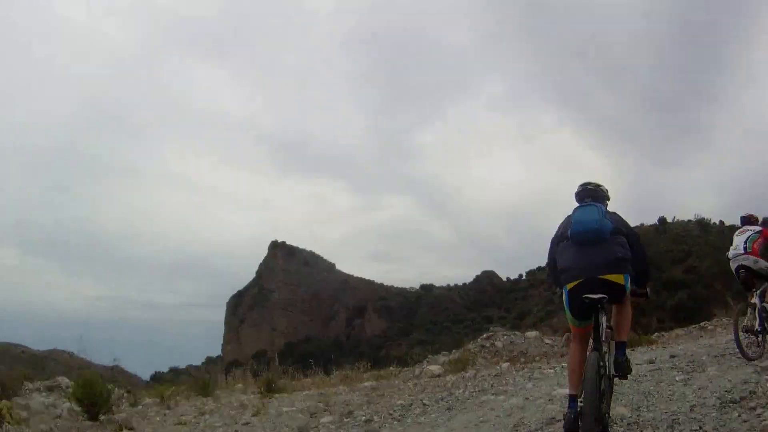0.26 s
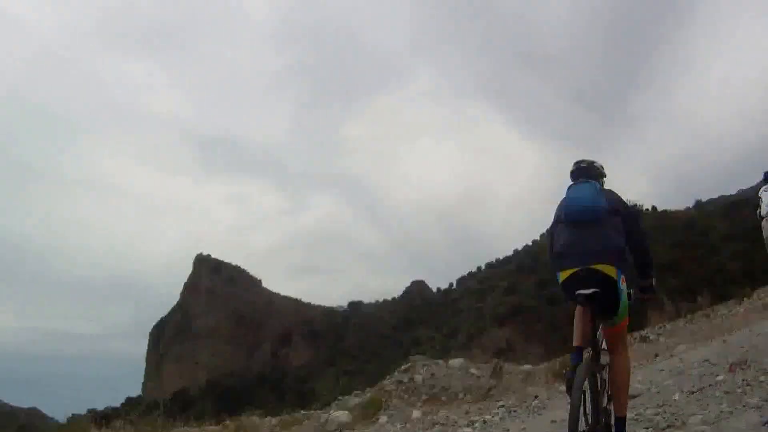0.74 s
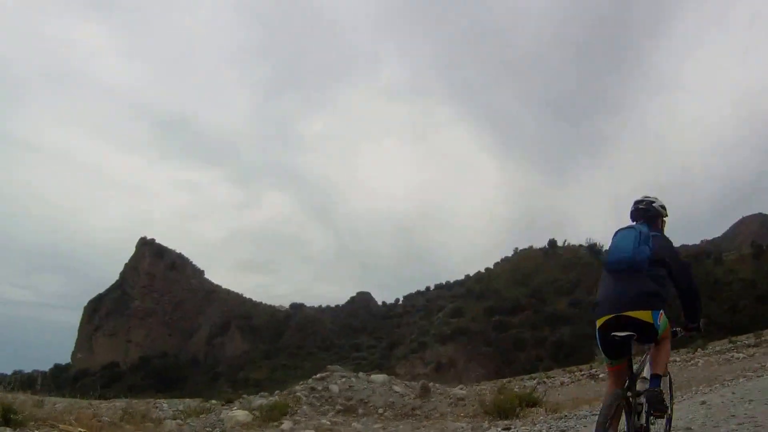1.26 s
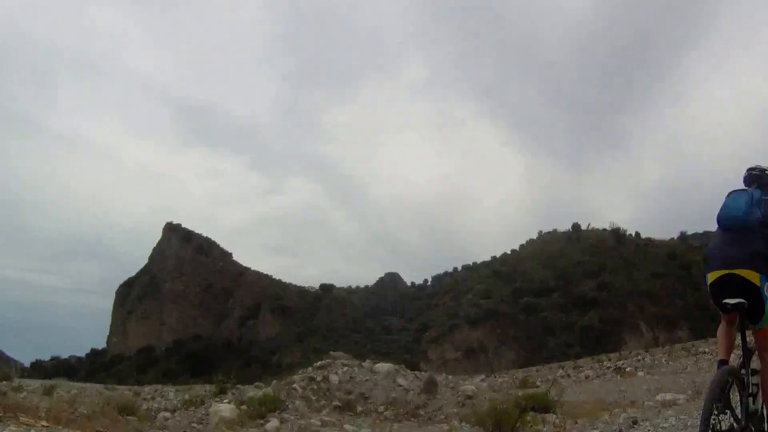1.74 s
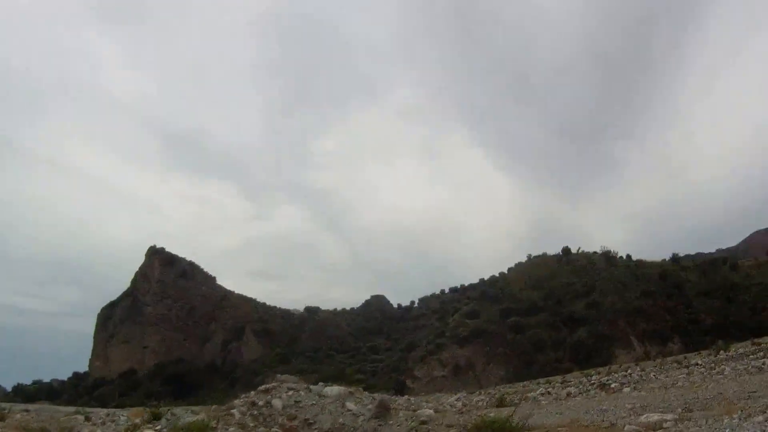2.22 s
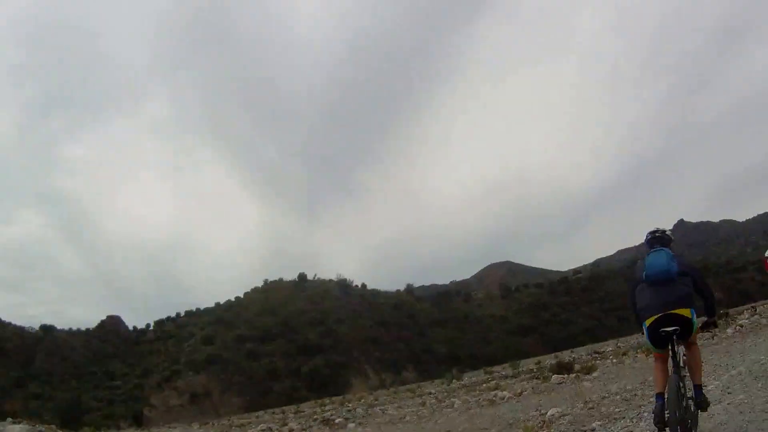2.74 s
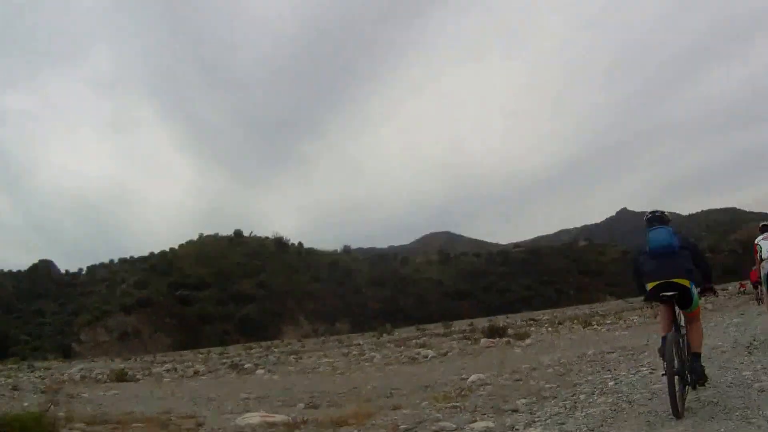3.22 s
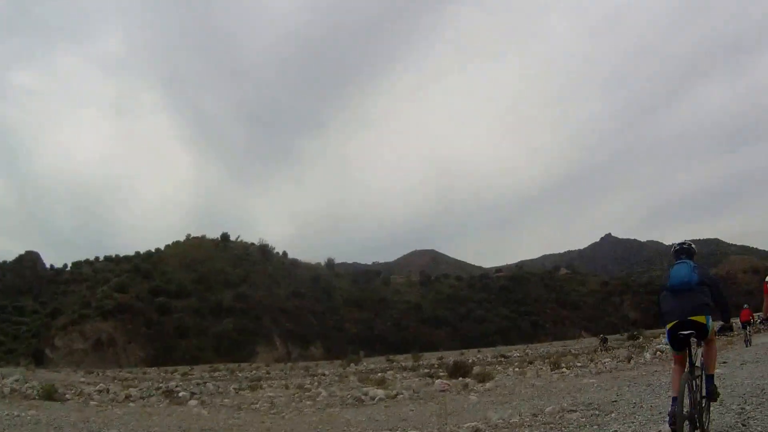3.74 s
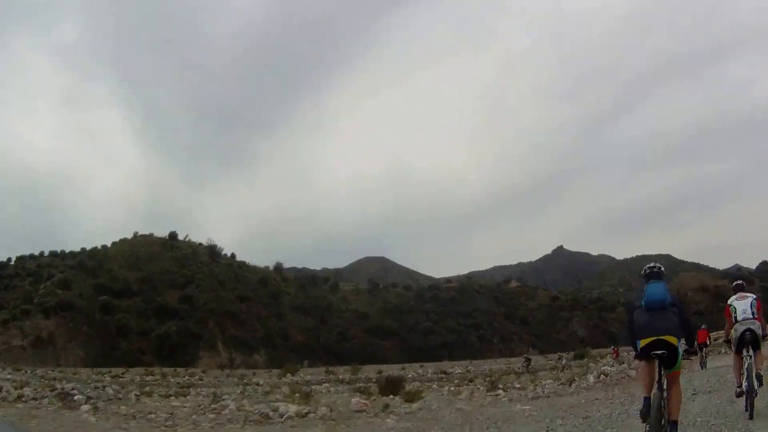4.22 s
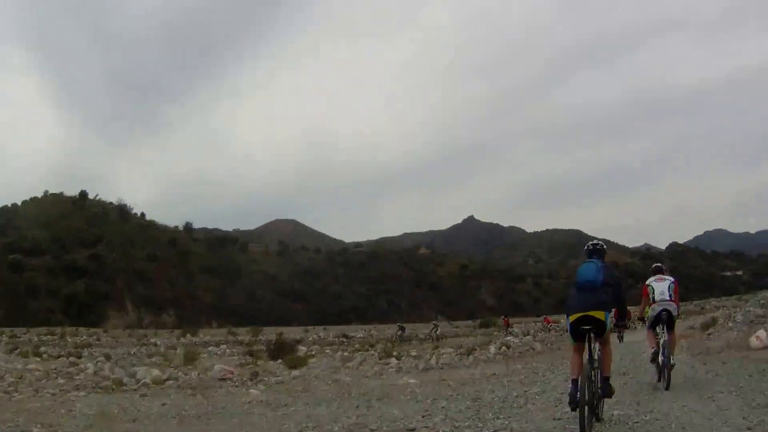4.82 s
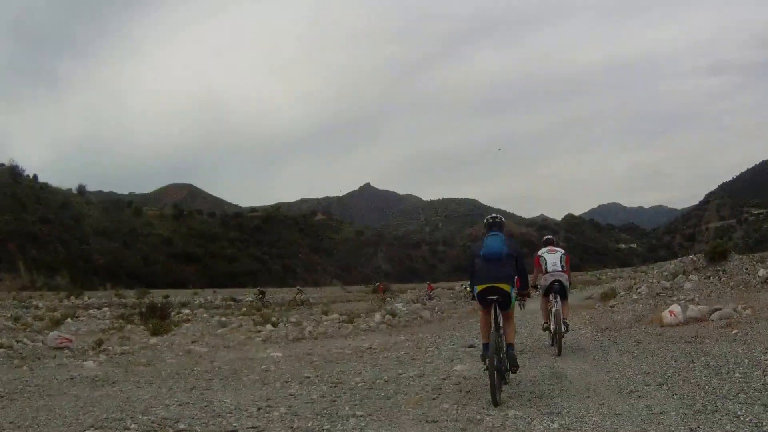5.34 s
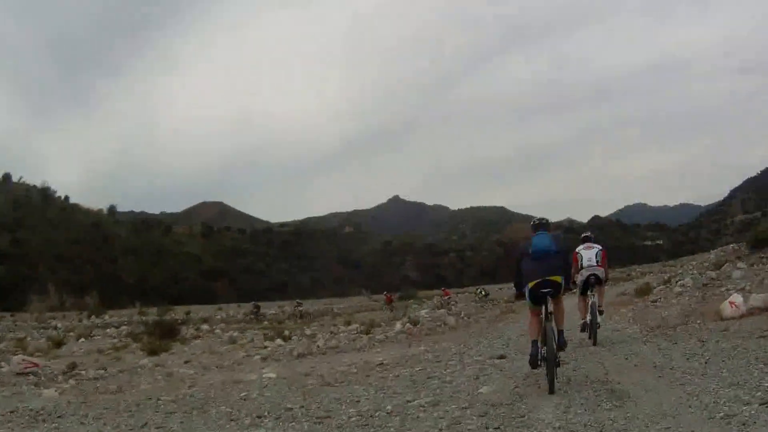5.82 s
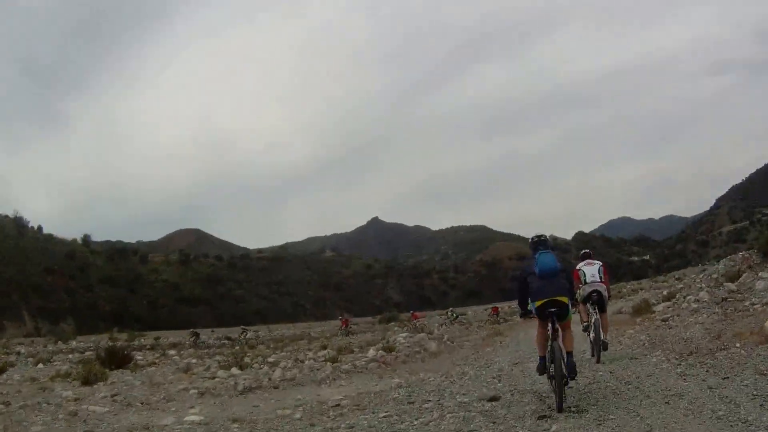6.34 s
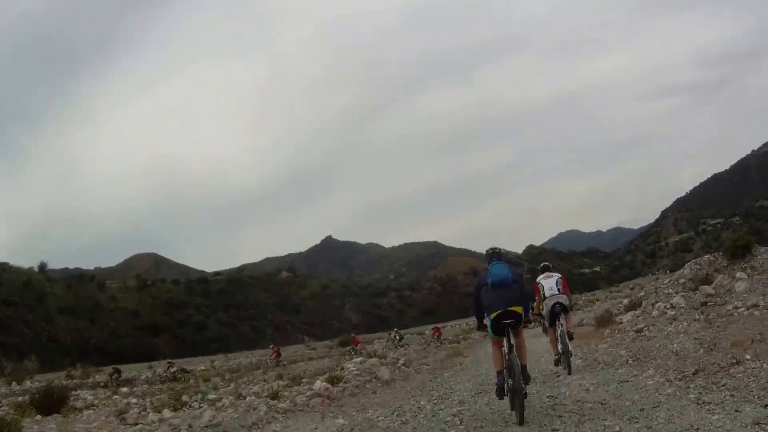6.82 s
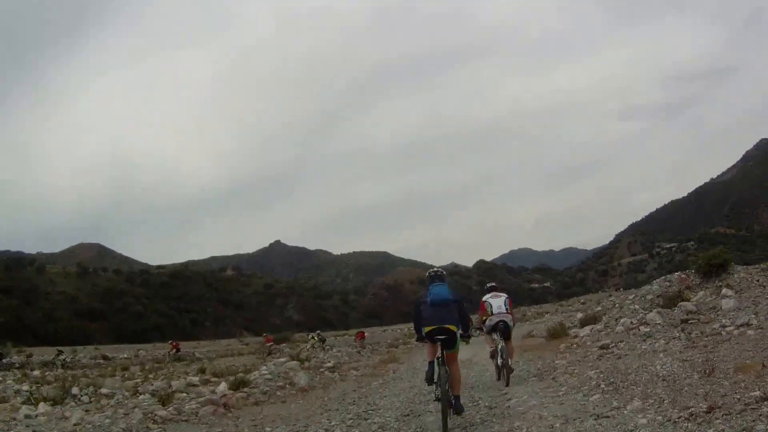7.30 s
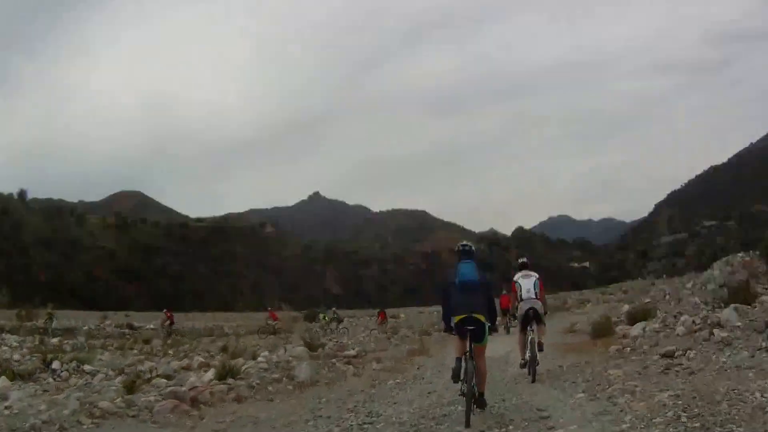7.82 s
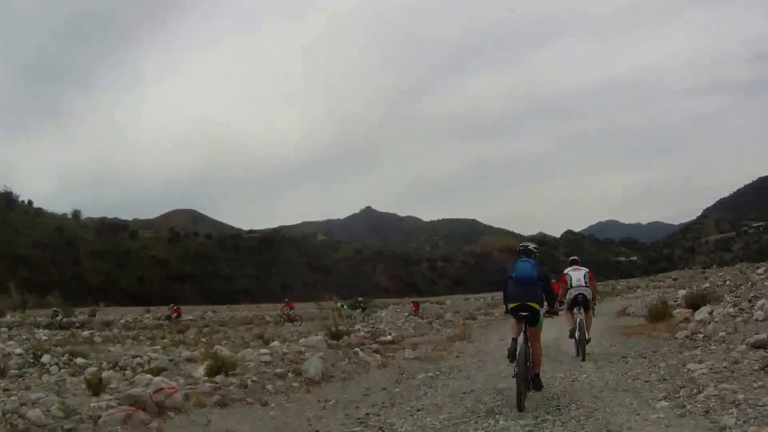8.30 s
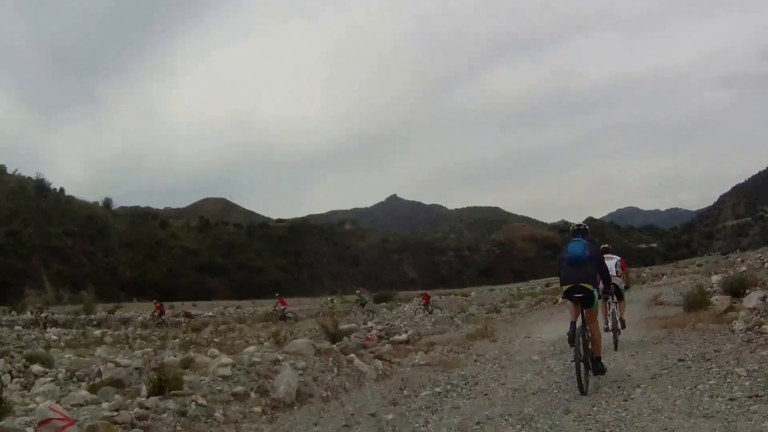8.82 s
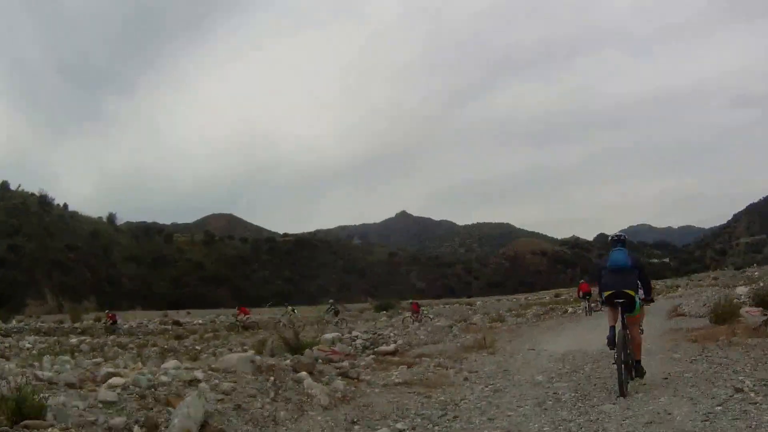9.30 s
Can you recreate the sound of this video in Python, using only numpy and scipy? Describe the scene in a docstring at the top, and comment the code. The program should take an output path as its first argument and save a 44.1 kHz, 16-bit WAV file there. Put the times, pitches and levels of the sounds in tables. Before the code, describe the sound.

Hard plastic knocks and rattles of a housed camera on a mountain bike jolting down stony gravel, over tyre roll, hiss and low rumble.

```python
"""A camera in a closed plastic housing rides on a bicycle down a stony track.
Tyre roll, loose chatter, gravel hiss (all shaped noise) and a low rumble run from the start to the end.
From about 0.3 s stones jolt the frame: clusters of bounces ring the housing, with short scrapes between.
The knocks thin out from about 3.6 s, then crowd together again from about 4.9 s.
The single microphone overloads on the hardest knocks."""
import sys
import numpy as np
from scipy import signal
from scipy.fft import rfft, irfft
from scipy.io import wavfile
from scipy.ndimage import uniform_filter1d

SR = 44100
rng = np.random.default_rng(int(sys.argv[2]) if len(sys.argv) > 2 else 0)


def level_to_linear(level):
    """Convert decibel levels to linear amplitude factors, elementwise."""
    exponent = np.asarray(level, float) / 20
    return 10 ** exponent


def put_to_file(sound):
    """Save the sound as 16-bit audio at rate SR, in the file named by the first command-line argument."""
    columns = np.atleast_2d(sound).T  # one column per channel
    safe = np.clip(columns, -1, 1)
    whole_steps = np.round(safe * 32767)
    wavfile.write(sys.argv[1], SR, whole_steps.astype(np.int16))


N = 421594  # length in samples


def evened(x):
    """Scales a sound to rms 1."""
    return x / np.sqrt(np.mean(x ** 2) + 1e-20)


def flutter(hz):
    """A wandering curve: straight lines between random points of rms 1, hz points a second."""
    points = rng.standard_normal(N // 16)
    return np.interp(np.arange(N) / SR * hz, np.arange(len(points)), points)


def ride():
    """How strongly the ride shakes the tyre roll, walls and window, one value in dB a sample."""
    # Each row: time in seconds, tyre roll in dB, chatter in the walls in dB,
    # chatter in the window in dB (all before the gusts).
    ride_levels = [(0.0, -39.5, -43, -46), (0.29, -34.5, -41, -40.5), (0.48, -31, -35, -35.5),
                   (0.9, -31, -29, -30.5), (1.36, -34, -41.5, -40.5), (2.16, -43, -28.5, -34.5),
                   (2.74, -33, -40, -37), (3.51, -30.5, -37.5, -36), (3.67, -40.5, -41.5, -43),
                   (3.99, -31.5, -36, -33.5), (4.13, -41, -50, -44), (4.63, -40.5, -50, -45.5),
                   (4.93, -31, -26, -31), (5.27, -34, -28.5, -32.5), (5.78, -33, -40.5, -42.5),
                   (6.1, -30, -40, -37.5), (6.31, -30, -27.5, -31), (6.58, -35.5, -39.5, -40),
                   (7.3, -30.5, -30, -35.5), (7.56, -30.5, -37, -37.5), (7.99, -30, -30.5, -34.5),
                   (8.33, -33.5, -38, -40.5), (9.19, -29, -27.5, -31.5), (9.56, -42.5, -50, -48)]
    s, *columns = np.transpose(ride_levels)
    return [np.interp(np.arange(N) / SR, s, column) for column in columns]


def rings(count, spread_db, squeak_db=0, tilt_db=0):
    """How mount, walls, window and edge ring after a click; each place of contact favours other modes."""
    # What the housing rings with. Each row: middle pitch in Hz, relative level in dB before chance and tilt,
    # time to fall by 60 dB in seconds.
    housing_modes = [(281, -6.5, 0.014), (390, 6, 0.018), (539, -0.5, 0.024), (751.8, 3.5, 0.04),
                     (1223, 11, 0.0074), (1357, -0.5, 0.036), (1608, 8, .016), (2350, 3.5, 0.0057),
                     (2758, -2, 0.0077), (3150, -2, 0.0086), (3555, -2.5, 0.01), (4114, -4, 0.007),
                     (4854, -6.5, 0.0073), (4920, -10.5, 0.0027), (5950, 0.5, 0.0015), (8400, -1.5, 0.0016),
                     (9800, -1, 0.001), (15720, -5.5, 0.0023)]
    # Borders between mount, walls, window and edge, in Hz.
    part_borders = [950, 2400, 5500]
    t = np.arange(1536) / SR
    out = np.zeros((4, count, len(t)))
    chance = rng.standard_normal((count, len(housing_modes), 2, 1))
    for k, (hz, db, t60) in enumerate(housing_modes):
        db = db + spread_db * chance[:, k, 0] + tilt_db * np.log2(hz / 1000)
        if k == len(housing_modes) - 1:
            db = db + squeak_db  # only the highest mode squeaks
        turns = hz * (1 + 0.011 * spread_db * chance[:, k, 1]) * t
        mode = level_to_linear(db - 60 * t / t60) * np.sin(2 * np.pi * turns)
        out[np.searchsorted(part_borders, hz)] += (-1) ** k * mode
    bands_hz = [(150, 1640), (700, 2370), (2200, 5700), (4500, 20400)]
    for part, band_hz in enumerate(bands_hz):
        band = signal.butter(2, band_hz, "band", fs=SR, output="sos")
        out[part] = signal.sosfilt(band, out[part])
    return out / np.linalg.norm(out, axis=2, keepdims=True)


def grit(per_s, spread_db, ms, smooth):
    """Noise of short scrapes, a few of them large, over a smooth shaking."""
    hits = rng.random(N) < per_s / SR
    size = level_to_linear(spread_db * np.minimum(rng.exponential(1, N), 3.2)) * hits
    bump = np.exp(-(np.arange(-200, 200) / (ms * SR / 1000)) ** 2)
    strength = evened(signal.oaconvolve(size, bump, "same")) + smooth
    sparse_noise = rng.standard_normal(N) * (rng.random(N) < .3)
    return strength * sparse_noise


def rumble(shaken):
    """Low noise through the mount, swelling with every jolt."""
    # Colour of the rumble. Each row: frequency in Hz, relative level in dB.
    rumble_colour = [(12, -52), (20, -14), (65, 1), (146, -6), (220, -7.5), (290, -2), (480, -120)]
    # Slow change of the rumble. Each row: time in seconds, change in dB.
    rumble_drift = [(0, 1), (3.5, 3), (6, -3), (9.56, 0.5)]
    rumble_db = -39  # rms before the slow drift
    hz, db = np.transpose(rumble_colour)
    bins_hz = np.fft.rfftfreq(N, 1 / SR)
    colour = level_to_linear(np.interp(np.log(bins_hz + 1), np.log(hz + 1), db))
    jolt_db = 10 * np.log10(abs(uniform_filter1d(shaken ** 2, 1100)) + 1e-5)  # power over 25 ms
    swelling_noise = rng.standard_normal(N) * level_to_linear(0.49 * jolt_db)
    low_noise = evened(irfft(rfft(swelling_noise) * colour, N))
    drift = level_to_linear(np.interp(np.arange(N) / SR, *np.transpose(rumble_drift)))
    return drift * level_to_linear(rumble_db) * low_noise


def gravel():
    """The tyres' hiss on the gravel, heard through the window of the housing: band-passed grit."""
    window_db = ride()[2]
    band = signal.butter(5, (2000, 5200), "band", fs=SR, output="sos")
    hiss = signal.sosfilt(band, grit(per_s=200, spread_db=0.5, ms=1.9, smooth=0.4))
    return evened(hiss) * level_to_linear(.5 * window_db - 29.5 + 0.52 * flutter(13))


def chatter(jolts):
    """Tyre roll drives the mount; loose play chatters in walls, window and edge, harder after knocks."""
    roll_db, walls_db, window_db = ride()
    recent_power = abs(signal.lfilter([.002], [1, -.998], jolts ** 2))  # fades over about 11 ms
    stirred_db = 10 * np.log10(1 + recent_power / level_to_linear(-47))
    gusts_db = 1.21 * flutter(25) + 2.43 * flutter(70) + 0.1 * stirred_db
    play = grit(per_s=140, spread_db=2.0, ms=1.44, smooth=0.22)
    roll = grit(per_s=60, spread_db=3.5, ms=3.6, smooth=0.94)
    sizzle = grit(per_s=90, spread_db=5.5, ms=2.75, smooth=0.39)
    # in the order mount, walls, window, edge
    drives = [0.63 * play + roll, play, 1.48 * play + sizzle, play + 0.053 * sizzle]
    levels_db = [roll_db + 0.96 * gusts_db,
                 walls_db + 1.0 * gusts_db,
                 window_db + 0.99 * gusts_db,
                 1.056 * window_db - 21 + 2.37 * gusts_db]
    turn = np.pi * flutter(9)  # the place of contact wanders over the housing
    shares = [np.cos(turn / 2 + np.pi * k / 4) ** 4 for k in range(4)]
    out = np.zeros(N)
    for drive, db, part_rings in zip(drives, levels_db, rings(4, 4.58)):
        shaking = evened(drive) * level_to_linear(db)
        for share, ring in zip(shares, part_rings):
            out += signal.oaconvolve(shaking * share, ring)[:N]
    return out


def scrapes():
    """Longer scrapes of the camera on the housing: rough contact rings the lower parts or the window."""
    # Each row: start in seconds, length in seconds, level of the rubbing in dB before it rings the parts,
    # share in the window from 0 to 1.
    scrape_list = [(.375, 0.03, -22.5, 0.8), (.53, 0.053, -19, 0.5), (1.02, 0.033, -20, 0.47),
                   (1.065, 0.033, -28, 1), (1.495, 0.051, -33, 1), (2.22, 0.035, -19.5, 0.3),
                   (3.28, 0.038, -22.5, 0.15), (4.305, 0.028, -30.5, 0.22), (4.605, 0.013, -27, 0.3),
                   (4.655, 0.011, -23.5, 0.36), (5.05, 0.048, -23, 1), (5.175, 0.041, -29, 0.7),
                   (7.86, 0.13, -26.5, 0.35), (7.91, 0.038, -24, 0.97), (8.06, 0.046, -19, 0.43),
                   (9.09, 0.053, -19.5, 0.56)]
    mount, walls, window, edge = rings(len(scrape_list), 3.5)
    out = np.zeros(N)
    for k, (s, length, db, share) in enumerate(scrape_list):
        share = np.clip(share, 0, 1)
        noise, gate = rng.standard_normal((2, 6000))
        rub = (noise * (abs(gate) > 1.3))[:round(length * SR)]
        rub = rub * signal.windows.tukey(len(rub), .6)
        lower_ring = 1.2 * mount[k] + 0.67 * walls[k]
        upper_ring = window[k] + 0.09 * edge[k]
        ring = np.sqrt(1 - share) * lower_ring + np.sqrt(share) * upper_ring
        sound = level_to_linear(db) * np.convolve(evened(rub), ring)
        out[round(s * SR):][:len(sound)] += sound
    return out


def with_rebounds():
    """Pairs each knock with a weaker, duller rebound, mostly after it; gives columns and bounce times."""
    # The hardest knocks. Each row: time of the height in seconds, ring level in dB,
    # thud in dB against the ring, bright part in dB against the ring (held to 1 later),
    # tick in dB against the ring.
    knock_list = [(0.2589, -12.5, -1, -5.5, -23), (0.3146, -5.5, -0.5, -3, -18.0),
                  (0.3756, -9.5, -4, -7, -29), (0.413, -0.1, -14, -5.0, -17),
                  (0.4737, -3.5, -15, -14.0, -36.0), (0.539, -6, -6, 4, -13.0), (0.547, -1, -9, -3.5, -11),
                  (0.553, -2, -7.0, -1.0, -11), (0.563, 0.5, -4.5, -1.0, -12.0), (0.603, -8, -16, -10, -26),
                  (0.616, -1.5, -10.5, -10, -23), (0.7019, -5.5, -2, -2.5, -14.0),
                  (0.7458, -1.5, -7.5, -8.5, -20.0), (0.7663, -0.8, -5, -4, -13),
                  (0.7862, -7, -11, -6.5, -16), (0.8202, -10, -18, -21, -36.0),
                  (0.8757, -8, -12, -3.0, -17), (0.8857, -7.5, -14, -5.5, -38.0),
                  (0.9153, -7, -7, -3.5, -22), (1.0113, -8, -9, -3.5, -13), (1.029, -2.5, -1, -4.0, -19.0),
                  (1.0468, -4, -9, -1.5, -15), (1.1454, -6.5, -13, -3, -16), (1.2005, -4.5, -7.5, -3, -38),
                  (1.4065, -1, -21, -4.5, -16), (1.4274, -11.5, 0, -3, -27.0), (1.4654, -4, -4, -2.5, -12),
                  (1.474, -7, -6.0, -4, -15), (1.5173, -12, -17, -4.5, -30.0),
                  (1.6409, -6, -1.5, -3.0, -14.0), (1.6939, -6, -14, -2, -34.0),
                  (1.6994, -3.5, -28, -2.5, -23), (1.78, -6.5, -3, -3, -14), (1.8245, -6, -9, 1, 1.5),
                  (1.857, -2.5, -7, -4.5, -15), (1.8795, -2, -19, -7, -19), (1.9599, -1.2, -8.5, -1, -24),
                  (1.9968, -9, -9.0, -5, -33.0), (2.026, 1.6, -8.5, -0.5, -17), (2.0898, -8, 0, -2, -22),
                  (2.1478, -4.5, -9, -1, -31.0), (2.157, 0, -7.5, -0.5, -14), (2.1953, -5, -25, -2.0, -32),
                  (2.2294, 1, -9, -2, -16), (2.2386, -1.5, -10, -2, -12), (2.2712, -7.4, -2, -1, -18.0),
                  (2.2978, -7.5, -15, -3.5, -15), (2.3976, -3, -17, -7.5, -33),
                  (2.4448, -9.5, -21, -1, -15.0), (2.5306, -7, -6, -1, -25.0), (2.5365, 0, -11, -3.5, -26),
                  (2.57, -7.5, -31, 1, -16.0), (2.5782, -3.5, -25, -18, -17),
                  (2.8986, -10.5, -6, -1, -18.0), (2.9397, -6.5, -7, -4, -21.0),
                  (2.965, -7.5, -3.5, -6.0, -21), (3.0489, -8.5, -7, -2, -16), (3.263, -10, -9, -4, -25.0),
                  (3.2792, -10.9, -6, -4.0, -20), (3.299, -6, -1.0, -3.0, -17), (3.3074, -3, -15, -4, -12),
                  (3.3234, -12, -8, -11, -32), (3.3426, -3.3, -2.5, -2, -18), (3.3557, 0.5, -8.5, -3, -21),
                  (3.3658, -11, -17, -4, -24.0), (3.3804, -11, -9, -9, -24), (3.3935, -7.5, 1, -4.0, -14),
                  (3.4058, -1.5, -13.0, -2, -19.0), (3.4704, -8.5, -12, -2, -10),
                  (3.5345, -2.5, -17.0, 1, 0), (3.6045, -6, -1.5, -2, -34), (3.6098, -5, -2, -3.0, -13),
                  (3.6201, -4, -6.0, -3.5, -22), (3.7844, -11, -3.5, -3.5, -24),
                  (3.9875, -7.5, -2.5, -3, -25.0), (4.105, -0.6, -5.5, -1, -20), (4.1372, -21, 8, -4, -13),
                  (4.2674, -14, -5, -1.5, -21), (4.3639, -12, -3.5, -0.5, -25),
                  (4.3706, -11.5, -11, -2, -32.0), (4.6826, -1.5, -4, -4.5, -14.0),
                  (4.7878, -7, -0.5, -3, -15), (4.801, -4, -10.0, -2, -33.0),
                  (4.829, -13, -13.0, -11, -30.0), (4.8541, -4, -14, -5.5, -24.5),
                  (4.9019, -12, -10, -1, -33), (4.9205, -13.5, 2, -4, -39.0), (4.9405, -10, -18, -4, -34),
                  (4.957, -7.0, -25, -3, -33), (5.0078, -5.5, -23, -3.5, -28),
                  (5.0317, 2.5, -22, -5.0, -21.5), (5.0566, 2, -17, -4.5, -14),
                  (5.0628, -5, -9.5, -1, -16.0), (5.0795, 2.8, -13, -2.5, -7),
                  (5.0905, -9, -5, -8.0, -21.0), (5.122, -1, -5.0, -4, -13), (5.1339, -9, -19, -0.5, -10),
                  (5.1475, -18, -19, -8, -23), (5.159, -3.5, -13, -11.0, -21), (5.216, -5, -4.5, -4.5, -13),
                  (5.2368, -5.5, 0, -5, -24), (5.2652, -3.5, -18, -11, -21),
                  (5.3426, -3.5, -18.0, -3, -26.0), (5.359, 1.2, -14, -9.0, -18),
                  (5.367, -2, -7.0, -8, -26.0), (5.3762, -1.5, -4.0, -7, -21.0),
                  (5.387, -2.5, -15.5, -9, -24), (5.3966, -5.0, -5.0, -11, -28.0),
                  (5.452, -1.3, -18, -13, -29), (5.4702, -2.5, -7, -2, -18.0), (5.511, -7, -17, -9.5, -9),
                  (5.516, 1, -6.0, -2, -15), (5.541, -12.5, 2, -9.0, -17), (5.554, -5.5, -8, -2.5, -17),
                  (5.6296, -1.5, -23, -3, -16), (5.9418, -16, -36, 0.0, -3), (6.0713, -5, -12, -1, -16),
                  (6.0922, -1.5, -15, -11.5, -26), (6.1576, -1, -16, -9.5, -21),
                  (6.166, -6, -10, -0.5, -28), (6.182, -5.5, -5.5, -3.5, -18),
                  (6.1893, -4.5, -15, -13, -22), (6.2064, -9.5, -16, -11, -35.0),
                  (6.3096, -7, -11, -11, -34.0), (6.3338, -6.5, -10, -17, -42),
                  (6.3425, -8, -14, -3.5, -20), (6.3857, -5, -21, -28, -48), (6.4465, -4, -9, -15.5, -39),
                  (6.4665, -6, -9, -6.5, -22), (6.5246, -6, -29, -12, -25.0), (6.5725, -7, -6.5, -11, -24),
                  (6.6282, -9.8, -4, -10, -22), (6.703, -7.6, -12, -2.0, -17),
                  (6.7096, -2.5, -13, -4, -13.5), (6.7225, -10, 3.5, -7.0, -22),
                  (6.7763, -6, -8, -6.5, -30), (6.8178, -8, -18, -23, -27), (6.847, -2, -9.5, -13.5, -27.0),
                  (6.8681, -10, 0, -8, -21.0), (6.9079, -6, -18, -27, -27.0),
                  (6.9262, -6, -21, -11.0, -29.0), (6.942, -5, -16, 0.5, -6), (6.95, -7, -24, -24, -27),
                  (7.0375, -9.5, -14, -25, -41.0), (7.1028, -6, -14, -7.5, -24),
                  (7.1669, -8, -18, -23, -32), (7.1884, -7, -9, -4.0, -23), (7.2184, -3.5, -19, -12.0, -34),
                  (7.2839, 2.5, -13.5, -3.5, -13), (7.3036, -5, -7, -21, -14),
                  (7.3212, 0.3, -13.5, -5, -21), (7.3398, -3, -13.0, -1.5, -18.0),
                  (7.423, -13, -0.5, -7, -20), (7.543, -9, -15.5, -19, -37),
                  (7.6187, -10.5, 0.5, -2.5, -21), (7.643, -8.5, -6, -4, -22),
                  (7.654, -0.5, -11, -13.5, -18.0), (7.8794, 0.1, -16.0, -5, -26.0),
                  (7.8895, -6, -8.5, -16.0, -28.0), (7.8978, -1.5, -23, -7, -24),
                  (7.9174, -5, -12, -3, -33), (7.9467, 0.2, -9, -19, -16), (7.9661, -5, -2, -3, -15),
                  (8.005, -8.5, -12, -8, -29), (8.0322, -10, -3.5, -13, -39.0),
                  (8.059, -2.5, -12, -20, -37), (8.0868, -12, 3, -5.0, -17), (8.0933, -7, -6, -14, -6.5),
                  (8.1056, -4.3, -4.0, -3.5, -17), (8.225, -8, -16, 0.5, -37),
                  (8.3723, -11.5, -12, -1, -33.0), (8.3937, -9.5, -13, -31, -35.0),
                  (8.6398, -0.3, -9.0, -7.5, -14.5), (8.6576, -7.9, 0, 0, -15.0),
                  (8.6787, -3.5, -11, -6.5, -22), (8.7354, -1.9, -9, -9.5, -19),
                  (8.7914, -5.5, -6, -7, -29), (8.8015, -6.8, -3.5, -4, -15), (8.8468, -1.3, -7, -2, -15),
                  (8.984, -2.2, -26, -6.5, -11), (9.051, -4, -26, -2, -14), (9.0745, 0.5, -6, -1.5, -13),
                  (9.083, -12, 1.0, -5, -15.0), (9.1088, -0.5, -4.5, -2, -11), (9.1269, -3, -9, -6.0, -11),
                  (9.1892, -1.5, -19, -11.5, -20), (9.2334, -8, -5, -1, -20), (9.2978, -5, -7.5, -5.5, -14),
                  (9.3242, -2.5, -9, -4.5, -24), (9.3475, -7, -13, -9, -20), (9.3989, -0.5, -18, -8, -19),
                  (9.514, 0.3, -24, -4, -20), (9.5334, -6, 2, -1.5, -8), (9.5483, -2, -5, -1, -13)]
    rebound_ms, extra_wait_ms = 8, 20  # shortest wait, and spread of the random extra wait
    early = .2  # share of rebounds that come just before the knock instead
    rebound_db, dull_db, tick_db, spread_db = -14.5, -4, -11, 2.5  # changes from the knock
    bounce_ms, bounce_spread_db, bounce_db_per_thud_db = 1.14, 2, 0.29  # heavy thuds bounce longer
    rows = np.array(knock_list)
    luck = rng.standard_normal((len(rows), 7))
    side = np.where(rng.random(len(rows)) < early, -1, 1)
    wait_s = (rebound_ms + extra_wait_ms * abs(luck[:, 0])) / 1000 * side
    change_db = [rebound_db, 0, dull_db, tick_db] + spread_db * luck[:, 1:5]
    both = np.vstack([rows, rows + np.column_stack([wait_s, change_db])])
    longer_db = bounce_db_per_thud_db * (both[:, 2] + 8) + bounce_spread_db * luck[:, 5:].T.ravel()
    return (*both.T, bounce_ms * level_to_linear(longer_db))


def knocks():
    """Each knock is a cluster of bounces that builds up, dies and rings the four parts."""
    lead_ms, blow = .8, 2.53  # how early the main blow falls, and its size among the bounces
    s, ring_db, thud_db, bright_db, tick_db, bounce_ms = with_rebounds()
    ms = (np.arange(1024) - 256) / SR * 1000
    draw = rng.standard_normal((len(s), 3, len(ms)))
    u = (ms + lead_ms) / np.clip(bounce_ms, .2, 6)[:, None]
    fade = np.exp(-np.where(u < 0, (u / 0.6) ** 2, abs(u / 1.17) ** 0.71))
    fade = fade + 0.084 * np.exp(-abs(ms) / np.where(ms < 0, 1.3, 4.5))  # smaller bounces lead in and trail off
    bounces = draw[:, 0] * (abs(draw[:, 1]) > 1.4) + 0.068 * draw[:, 2]
    contact = bounces * fade * signal.windows.tukey(len(ms), .3)
    contact[:, np.searchsorted(ms, -lead_ms)] += blow * np.sign(draw[:, 2, 0])

    bright_db = np.minimum(bright_db, 1)
    dull_db = 10 * np.log10(np.clip(1 - level_to_linear(bright_db) ** 2, .03, 1))  # the walls take what the window does not
    ring_db = np.minimum(ring_db, 3)  # ring level is held to at most 3 dB
    levels_db = ring_db + np.array([thud_db, dull_db, bright_db, tick_db])
    # sharp glancing knocks sing at the top
    squeak_db = 1.0 * np.clip(tick_db + bright_db + 7.0, 0, 10)[:, None]
    # per octave: dull knocks favour the lower modes of each part
    tilt_db = 0.95 * np.clip(bright_db + 6.5, -15, 4)[:, None]
    parts = rings(len(s), 2.47, squeak_db, tilt_db)
    powers = [1.4, 1.0, 0.61, 0.82]  # how each part weighs hard bounces against soft ones
    out = np.zeros(N + SR)
    for part, db, power in zip(parts, levels_db, powers):
        push = contact * (abs(contact) + 1e-9) ** (power - 1)
        sound = signal.fftconvolve(push, part, axes=1)
        sound *= (level_to_linear(db) / abs(sound).max(1))[:, None]  # sets the peak of each part
        places = np.round(s * SR).astype(int)[:, None] + np.arange(sound.shape[1])
        np.add.at(out, places, sound)
    return out[256:N + 256]


def scene():
    """Everything that reaches the one microphone inside the housing, fed to both channels."""
    jolts = knocks() + scrapes()
    bed = chatter(jolts) + gravel()
    # walls and window cancel where they meet
    bed = bed - 1.3 * signal.lfilter(*signal.iirpeak(2480, 7.0, SR), bed)
    shaken = jolts + bed
    return np.tile(shaken + rumble(shaken), (2, 1))


def microphone(sound):
    """Adds hiss, clips near full scale and cuts the treble steeply."""
    hiss = level_to_linear(-75) * rng.standard_normal(N)
    heard = np.clip(sound + hiss, -.96, .96)
    return signal.oaconvolve(heard, signal.firwin(101, 15100, fs=SR), "same")


def parted(x):
    """The two channels part in brief patches, most in the treble: phase-scrambled sound, plus and minus."""
    # How far the channels part. Each row: frequency in Hz, side level in dB against the middle in a patch.
    side_levels = [(200, -37.5), (1300, -32), (3000, -28), (8000, -7), (15000, -1)]
    hz, t, z = signal.stft(x, SR, nperseg=256, noverlap=192)
    patches = rng.random((len(t) // 32 + 1, 10)) < .4
    patches = patches.repeat(32, 0).repeat(13, 1)[:len(t), :len(hz)].T  # each about 46 ms by 2.2 kHz
    turn = np.exp(2j * np.pi * rng.random((len(t), len(hz)))).T
    f, db = np.transpose(side_levels)
    level = level_to_linear(np.interp(np.log(hz + 1), np.log(f), db))[:, None]
    side = signal.istft(z * turn * patches * level, SR, nperseg=256, noverlap=192)[1][:N]
    return np.array([x + side, x - side])


def band_limit(x):
    """A steep low-pass at the top of the band."""
    return signal.sosfilt(signal.butter(12, 16430, fs=SR, output="sos"), x)


def record(dry):
    """The microphone hears one channel, which is then parted into two."""
    heard = microphone(dry[0])
    return band_limit(parted(heard))


dry = scene()
out = record(dry)
put_to_file(out)
```